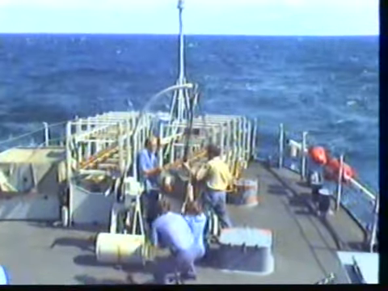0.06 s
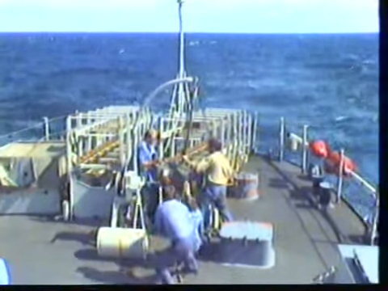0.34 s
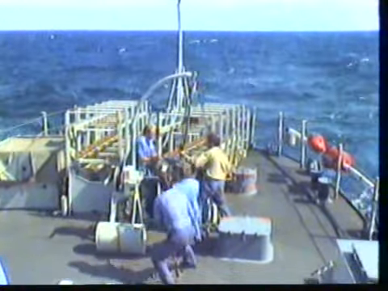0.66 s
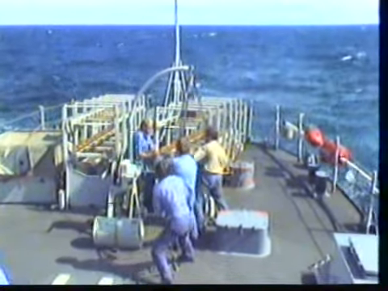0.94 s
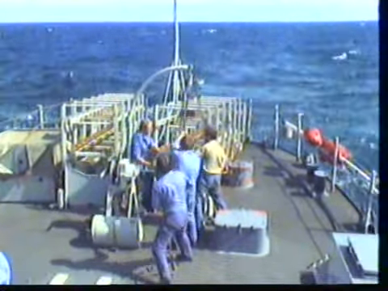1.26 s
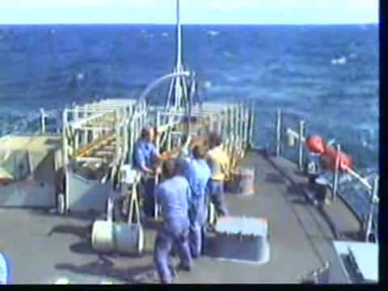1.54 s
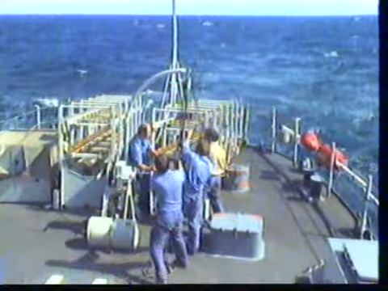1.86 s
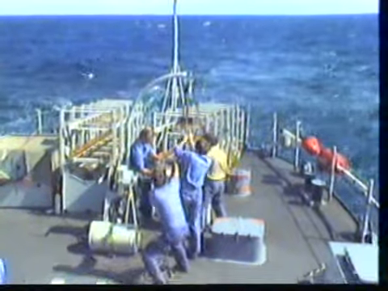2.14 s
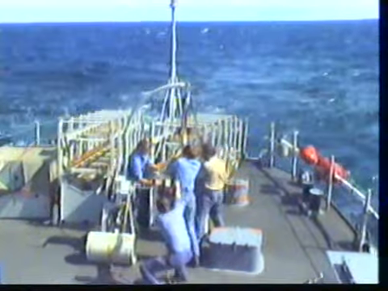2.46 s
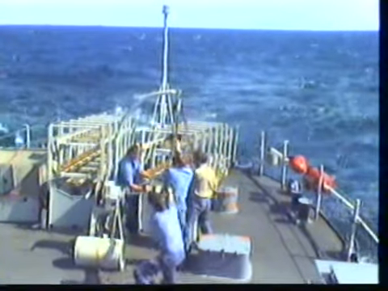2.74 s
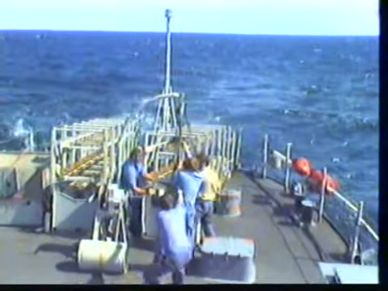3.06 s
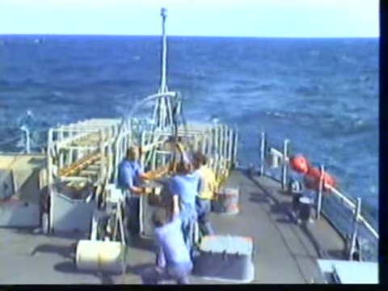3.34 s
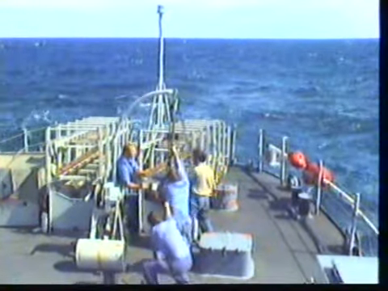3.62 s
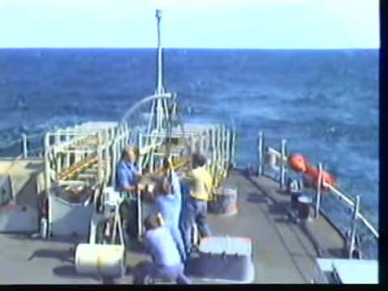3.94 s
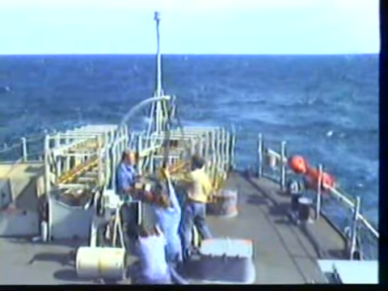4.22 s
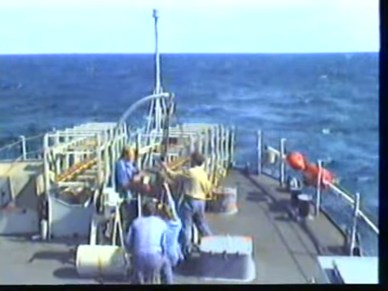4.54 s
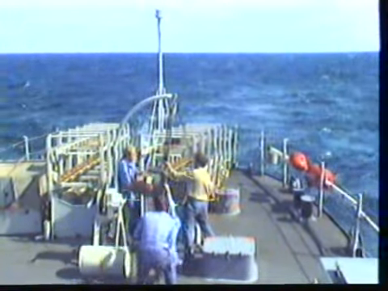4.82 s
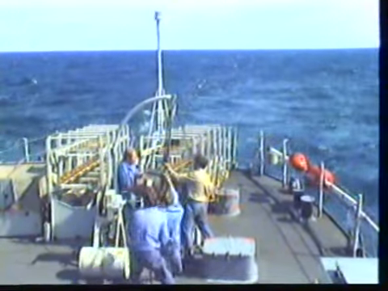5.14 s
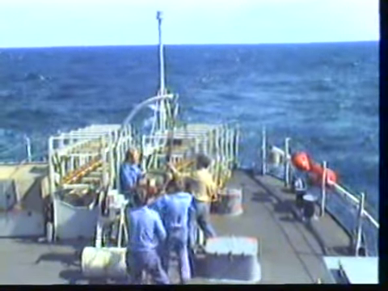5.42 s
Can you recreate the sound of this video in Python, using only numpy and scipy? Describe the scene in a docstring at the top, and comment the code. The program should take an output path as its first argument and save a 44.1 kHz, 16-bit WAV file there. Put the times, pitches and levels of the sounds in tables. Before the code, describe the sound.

A constant engine drone and hum at sea, with a few low wind thumps, faint clinks of gear and tape hiss.

```python
"""The stern deck of a warship under way, in open air, heard through one camcorder microphone.
The engines drone through the funnel with one steady hum, and a diesel knocks about fifteen times a
second; the wind carries them aft, now clearer, now fainter. Gusts thump right on the microphone for a
moment. On deck, gear clinks and squeaks as the crew hauls on it, and boots scuff.
The camcorder ducks after the thumps and adds its tape hiss."""
import sys
import numpy as np
from scipy import signal
from scipy.fft import rfft, irfft
from scipy.io import wavfile
from scipy.ndimage import uniform_filter1d

SR = 44100
rng = np.random.default_rng(int(sys.argv[2]) if len(sys.argv) > 2 else 0)


def pcm_store(signal):
    """Save signal as 16-bit PCM."""
    levels = np.round(np.clip(np.atleast_2d(signal), -1, 1) * 32767)
    wavfile.write(sys.argv[1], SR, levels.astype(np.int16).T)


N = 250488
T = np.arange(N) / SR
FREQS = np.maximum(np.arange(N // 2 + 1) * SR / N, 1)


# broad colours of the engines, heard from the stern: (frequency [Hz], relative level [dB])
DRONE_COLOUR = [(45, -63), (80, -19), (110, -9), (165, -12), (190, -3.5), (240, 1), (310, -3.5),
                (390, -10.5), (470, -12.5), (700, -30.5)]
RUSH_COLOUR = [(250, 2.5), (430, -8), (560, -4), (750, -4.5), (1000, -8.5), (1400, -11.5), (2000, -20.5),
               (3500, -34)]
CLATTER_COLOUR = [(400, -17), (900, 0.5), (1500, -1), (2000, -5.5), (2400, -8.5), (3000, -11.5),
                  (3700, -15), (4500, -19), (7000, -29.5)]
# narrow resonances of funnel and casing: (frequency [Hz], width [Hz], lift [dB])
FUNNEL_MODES = [(188.3, 4.9, 8.5), (219.8, 7.2, 5.5), (354, 10.2, 7), (376.6, 7.2, 7.5), (403, 5.4, 10.5),
                (549.5, 28, 5.5), (643, 99, 4), (807, 20, 5), (871, 14, 7.5), (1443, 12, 6),
                (1973, 55, 5.5), (2665, 82, 0), (3430, 50, 2.5)]
# how well the wind carries the engines aft to the microphone: (time [s], carry [dB])
WIND_CARRY = [(0, 0.5), (.2, -2), (.6, -4.5), (1.3, -6), (1.7, -4.5), (2.5, -4.5), (2.8, -5), (3.45, -0.1),
              (5.68, -0.5)]

def engines(drone_db=-31.5, rush_db=-40.5, clatter_db=-47.5, throb=0.028, flutter_db=1.05):
    """Exhaust drones and rushes in the funnel; the diesel clatters and knocks above it."""
    carry_db, = curves(WIND_CARRY)
    beat = diesel_beat()
    surge = unit(1 + throb * beat)
    # each band follows the carry by its own factor: low sound fades least on the way aft
    drone = steady(noise(DRONE_COLOUR, FUNNEL_MODES), span_s=.1) * undb(drone_db + 0.11 * carry_db)
    rush = noise(RUSH_COLOUR, FUNNEL_MODES) * surge * undb(rush_db + 0.5 * carry_db)
    clatter = noise(CLATTER_COLOUR, FUNNEL_MODES) * surge * undb(clatter_db + 1.87 * carry_db)
    knock = diesel_knock(beat)
    flutter = undb(flutter_db * walk(rate_hz=22.256))  # gusty air shakes the higher sound
    return drone + (rush + clatter) * flutter + knock


# speed of the diesel's shaft: (time [s], speed [turns/s])
SHAFT_SPEED = [(0, 15.28), (1.2, 15.40), (2.1, 15.52), (3.0, 15.24), (4.1, 15.21), (5.0, 15.35)]

def diesel_beat(first_knock_s=.012, rise_s=0.00075, decay_s=0.017, uneven_db=.5):
    """Envelope of the diesel: one sharp, nearly even knock a turn that dies away before the next."""
    speed, = curves(SHAFT_SPEED)
    turns = np.cumsum(speed) / SR - first_knock_s * speed[0] + 1
    age_s = turns % 1 / speed
    force = undb(uneven_db * rng.standard_normal(int(turns[-1]) + 1))
    attack = 1 - np.exp(-(age_s / rise_s) ** 2)
    return unit(force[turns.astype(int)] * attack * np.exp(-age_s / decay_s))


# modes of the diesel's casing: (frequency [Hz], width [Hz], relative level [dB])
KNOCK_MODES = [(1430, 170, 7), (1650, 570, -4), (1945, 91, 2), (2694, 66, 0.5), (3030, 84, -14),
               (3360, 36, -18), (3820, 210, -13)]
# how strongly the knock reaches the stern: (time [s], level [dB])
KNOCK_AT_STERN = [(0, -58), (.6, -58.5), (1.7, -63), (2.2, -54.5), (3.0, -54.5), (4.3, -51.5), (5.4, -50)]

def diesel_knock(beat):
    """The diesel's casing rings at each knock of the beat."""
    level_db, = curves(KNOCK_AT_STERN)
    return steady(ringing(KNOCK_MODES), span_s=0.0075) * beat * undb(level_db)


# swells on top of the steady hum: (middle time [s], added level [dB], half length [s])
HUM_RISES = [(.4, -48.5, .3), (1.18, -33, 0.034), (3.28, -38.5, .07), (5.35, -42.5, 0.5)]

def hum(pitch_hz=290.3, level_db=-37, waver_db=2.0, waver_hz=0.853):
    """One machine tone that wavers and swells on its way across the deck."""
    phase = 2 * np.pi * np.cumsum(pitch_hz + waver_hz * walk(rate_hz=9)) / SR
    rms = undb(level_db + waver_db * walk(rate_hz=16)) + swells(HUM_RISES)
    return np.sqrt(2) * np.sin(phase) * rms


# rumble of air right on the microphone: (frequency [Hz], relative level [dB])
WIND_COLOUR = [(20, -23), (35, -10), (50, -14.5), (75, -3), (115, -4), (160, -3.5), (250, -17),
               (800, -35.5)]
# gusts on top of the light breeze: (middle time [s], level [dB], half length [s])
WIND_GUSTS = [(.39, -38.5, 0.1), (.9, -40, 0.087), (1.648, -21.5, 0.019), (1.72, -30, 0.039),
              (1.88, -29, .05), (2.08, -26.5, 0.14), (2.38, -30, 0.103), (2.62, -30, 0.082),
              (2.9, -38, 0.095), (3.1, -34, 0.072), (3.65, -40, 0.19), (4.5, -46.5, .15)]
# single eddies hitting the microphone: (start time [s], peak level [dB], pitch [Hz], swell time [s])
EDDIES = [(1.624, -21, 85, 0.0033), (1.648, -15, 119, 0.0079), (1.832, -25, 69.4, 0.011),
          (1.884, -14.5, 109, 0.0043), (1.906, -14.5, 66.7, 0.0044), (1.929, -13, 109, 0.0061),
          (2.082, -11.5, 81.5, 0.0025), (2.113, -12, 120, 0.0045), (2.332, -21, 105, 0.0029),
          (2.563, -18.5, 110, 0.0042), (2.602, -25, 91, 0.0088), (2.638, -20, 113, 0.0069)]

def wind(breeze_db=-46.5, restless_db=2.2, ragged=0.16):
    """Wind rumbles on the microphone; strong gusts break into eddies that thump it for a few cycles."""
    breeze = undb(breeze_db + restless_db * walk(rate_hz=6))
    rumble = steady(noise(WIND_COLOUR), span_s=0.049) * np.hypot(breeze, swells(WIND_GUSTS))
    clock = np.cumsum(1 + ragged * walk(rate_hz=200)) / SR  # uneven time roughens each eddy's pitch
    thumps = 0
    for start_s, peak_db, hz, swell_s in EDDIES:
        age = np.maximum(T - start_s, 0) / swell_s
        swell = (age / 2) ** 2 * np.exp(2 - age)  # peaks at 1 after two swell times
        eddy = np.sin(2 * np.pi * hz * (clock - np.interp(start_s, T, clock)))
        thumps = thumps + undb(peak_db) * swell ** 2 * eddy
    return rumble + thumps


# knocks of gear out on the deck: (time [s], strength [dB], decay [s])
GEAR_CLINKS = [(.925, -54, 0.0094), (1.378, -53.5, 0.0085), (2.025, -50, 0.0061), (2.345, -60, 0.0099),
               (2.473, -58, 0.0092), (2.543, -43, 0.016)]
# modes of that gear: (frequency [Hz], width [Hz], relative level [dB])
GEAR_MODES = [(1430, 250, -5), (1900, 480, -2), (2810, 59, 6), (3370, 150, -13), (3680, 150, -11)]

def gear(rise_s=0.0027):
    """Metal parts scrape together briefly and ring."""
    contact = 0
    for start_s, db, decay_s in GEAR_CLINKS:
        age_s = np.maximum(T - start_s, 0)
        contact = contact + undb(db) * 2 * (1 - np.exp(-age_s / rise_s)) * np.exp(-age_s / decay_s)
    return steady(ringing(GEAR_MODES), span_s=0.01) * contact


def pulley_squeak(at_s=3.998, half_length_s=.022, pitch_hz=1700, rough=.006, db=-42.5, octave_db=-10):
    """A pulley squeaks once under load, short and rough."""
    phase = 2 * np.pi * np.cumsum(pitch_hz * (1 + rough * walk(rate_hz=200))) / SR
    tone = np.sin(phase) + undb(octave_db) * np.sin(2 * phase)
    return tone * swells([(at_s, db, half_length_s)])


# soles sliding, faint under the engines: (middle time [s], level [dB], half length [s])
BOOT_SLIDES = [(0.043, -49, 0.13), (0.146, -43, 0.012), (0.265, -44.5, 0.025), (1.12, -52, 0.032),
               (1.37, -51, 0.028), (2.51, -48.5, 0.034), (2.68, -45, 0.039), (3.36, -45, 0.067),
               (3.95, -45, .08)]
# colour of a sole on grit: (frequency [Hz], relative level [dB])
SOLE_COLOUR = [(700, 6.5), (1700, 5), (2600, -4.5), (3800, -11), (5500, -20)]

def boot_scuffs():
    """Boots slide briefly on the gritty deck."""
    return noise(SOLE_COLOUR) * swells(BOOT_SLIDES)


def undb(db):
    """Decibels to gain."""
    return 10 ** (np.asarray(db) / 20)


def unit(x):
    """Scale to rms 1."""
    return x / np.sqrt(np.mean(x ** 2))


def curves(table):
    """Each value column of a table that starts with time [s], sample by sample."""
    times, *columns = np.transpose(table)
    return [np.interp(T, times, column) for column in columns]


def swells(table):
    """Summed bell-shaped envelopes of (middle time [s], level [dB], half length [s]) rows."""
    return sum(undb(db) * np.exp(-((T - middle_s) / half_s) ** 2) for middle_s, db, half_s in table)


def walk(rate_hz):
    """Smooth random wandering with a spread near 1."""
    hold = int(SR / rate_hz)
    steps = np.repeat(rng.standard_normal(N // hold + 1), hold)
    return 1.526 * uniform_filter1d(uniform_filter1d(steps, hold), hold)[:N]


def noise(colour, resonances=()):
    """Noise with a broad colour, lifted at narrow resonances; rms 1."""
    hz, db = np.transpose(colour)
    shape_db = np.interp(np.log(FREQS), np.log(hz), db)
    for centre, width, lift in resonances:
        shape_db = shape_db + lift / (1 + (2 * (FREQS - centre) / width) ** 2)
    skirts = np.minimum(FREQS / hz[0], 1) ** 2 * np.minimum(hz[-1] / FREQS, 1) ** 2
    return unit(irfft(rfft(rng.standard_normal(N)) * undb(shape_db) * skirts, N))


def ringing(modes):
    """Rough metal contact heard through a few damped modes; rms 1."""
    ring = sum(undb(db) * np.abs(1 / (1 + 2j * (FREQS - hz) / width)) ** 1.2 for hz, width, db in modes)
    return unit(irfft(rfft(rng.standard_normal(N)) * ring, N))


def steady(x, span_s):
    """Even out the swells that last longer than a span."""
    return x / np.sqrt(uniform_filter1d(x ** 2, int(span_s * SR)) + 1e-9)


def scene():
    """Open air at the stern, with no echo; one microphone feeds both channels."""
    deck = engines() + hum() + wind() + gear() + boot_scuffs() + pulley_squeak()
    return np.array([deck, deck])


def gain_control(x, threshold_db=-25.0, recover_s=0.64, sense_s=0.017, attack_s=0.0091):
    """Sound above the threshold turns the camcorder's gain down quickly; it creeps back afterwards."""
    def lag(v, span_s):
        return signal.lfilter([1], [1, -np.exp(-1 / (span_s * SR))], v) / (span_s * SR)

    level_db = 10 * np.log10(lag(x[0] ** 2, sense_s) + 1e-12)
    over_db = np.maximum(level_db - threshold_db, 0)
    fade = np.exp(-T / recover_s)
    held_db = np.maximum.accumulate(over_db / fade) * fade  # each peak decays until a higher one comes
    return x * undb(-lag(held_db, attack_s))


# bright tape hiss behind everything: (frequency [Hz], relative level [dB])
HISS_COLOUR = [(1000, -23), (4000, -16.5), (5500, -10), (7000, -6.5), (8500, -3.5), (10000, -0.5),
               (11500, 1), (12700, -0.5), (13700, -6.5)]

def record(dry, hiss_db=-52.0, side_db=-20, low_cut_hz=42, top_hz=13850, headroom=0.2):
    """The camcorder thins the deep bass, ducks after thumps, rounds peaks, adds hiss and cuts the top."""
    highpass = signal.butter(4, low_cut_hz, btype="high", fs=SR, output="sos")
    lowpass = signal.ellip(12, .1, 85, top_hz, fs=SR, output="sos")
    ducked = gain_control(signal.sosfilt(highpass, dry))
    taped = headroom * np.tanh(ducked / headroom)
    hiss = noise(HISS_COLOUR) + undb(side_db) * noise(HISS_COLOUR) * np.array([[1], [-1]])
    return signal.sosfilt(lowpass, taped + undb(hiss_db) * hiss)


dry = scene()
out = record(dry)
pcm_store(out)
```